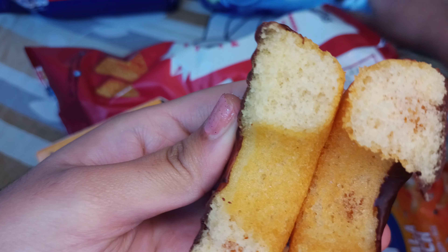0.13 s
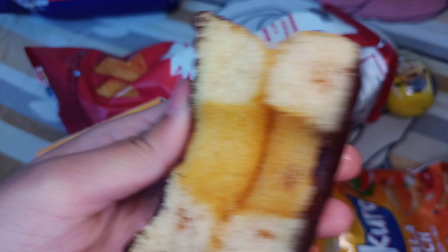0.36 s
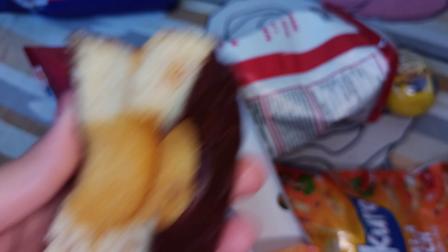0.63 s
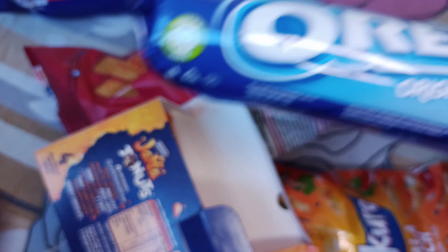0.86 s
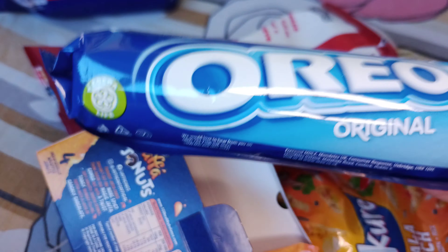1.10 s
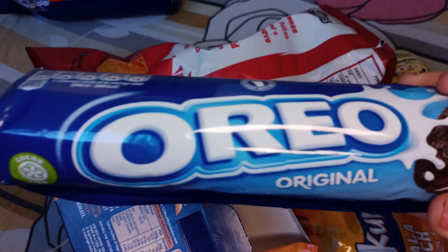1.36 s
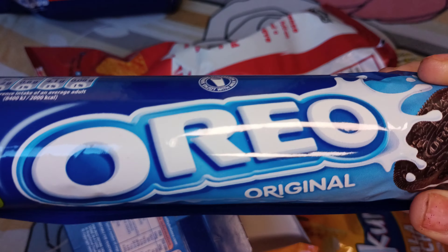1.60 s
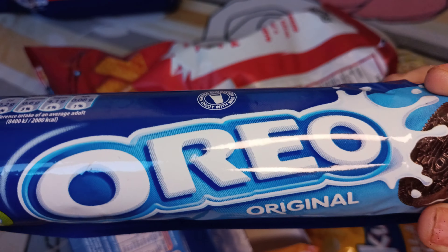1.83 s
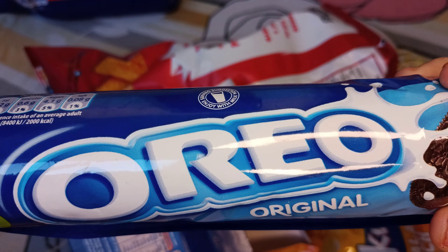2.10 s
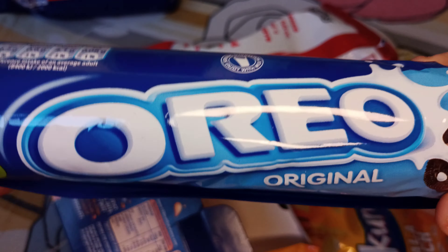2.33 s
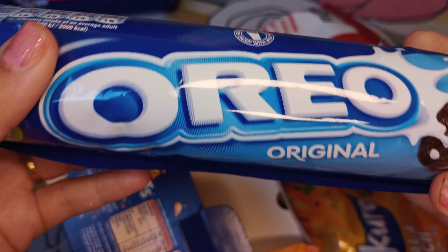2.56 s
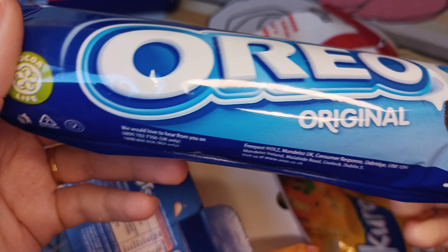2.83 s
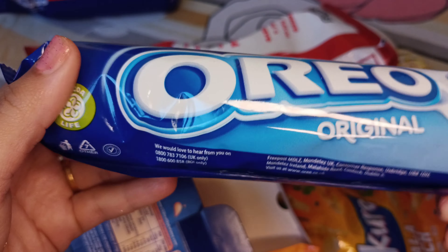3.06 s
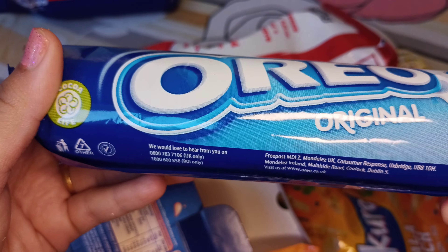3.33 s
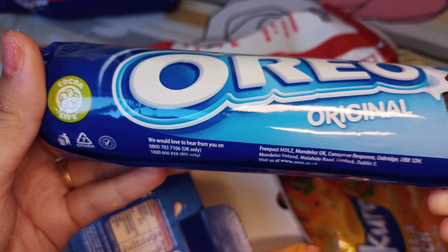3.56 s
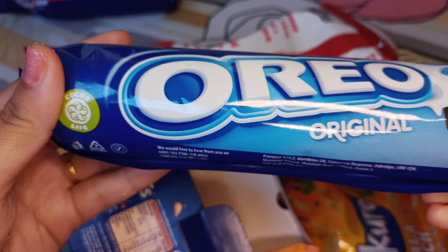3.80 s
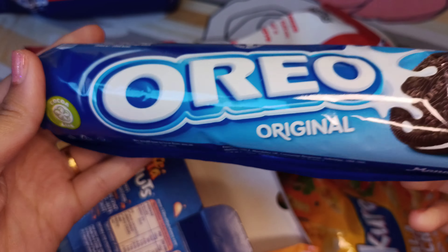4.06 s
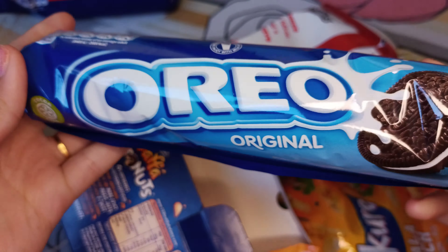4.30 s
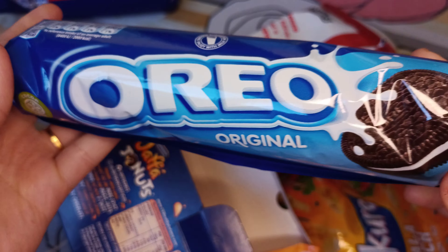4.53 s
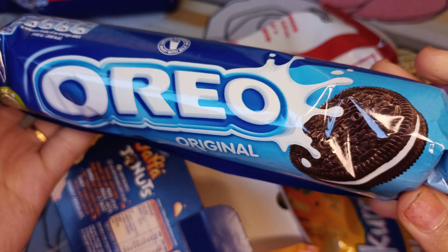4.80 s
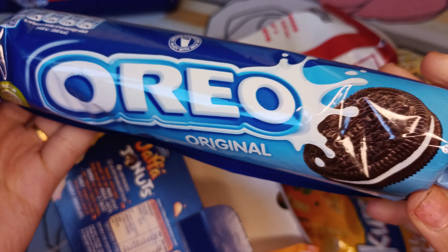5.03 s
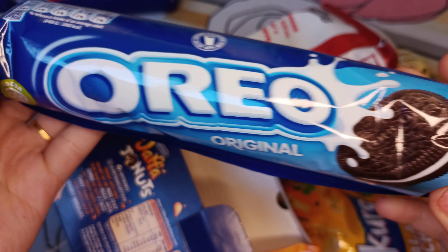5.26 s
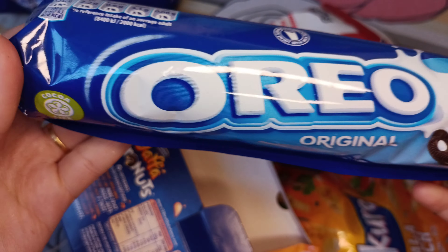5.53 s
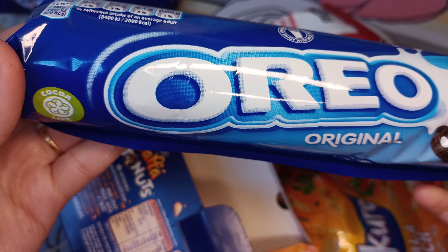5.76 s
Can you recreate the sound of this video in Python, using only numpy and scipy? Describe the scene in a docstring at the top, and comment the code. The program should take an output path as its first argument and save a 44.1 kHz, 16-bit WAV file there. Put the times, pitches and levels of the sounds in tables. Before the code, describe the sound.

A plastic snack wrapper is turned in the hands close up, snapping and crackling in bright bursts over a faint low hum in a furnished room.

```python
"""A furnished room, where two hands turn a plastic snack wrapper close to a phone microphone.
Creases snap over with a crack and damped rings; the film rustles in clumps of many small random crackles.
The room answers with fading noise tails, and fingers bump the bag as soft low thuds.
An appliance hums on two close tones and a weaker higher one, over soft filtered room noise."""
import sys
import numpy as np
from scipy import signal
from scipy.fft import rfft, irfft
from scipy.io import wavfile
from scipy.ndimage import map_coordinates

SR = 44100
rng = np.random.default_rng(int(sys.argv[2]) if len(sys.argv) > 2 else 0)


def makeup_ratio(level_db):
    """Linear amplitude ratio for a level in decibels (20 dB per factor of ten)."""
    decades = np.asarray(level_db, float) / 20
    return 10 ** decades


def materialize(psi):
    """Save the field psi as 16-bit PCM at rate SR to the path in sys.argv[1].

    A 1-D psi becomes a single channel; in a 2-D psi each row is a channel.
    """
    bounded = np.clip(np.atleast_2d(psi).T, -1, 1)
    quanta = np.round(bounded * 32767).astype(np.int16)
    wavfile.write(sys.argv[1], SR, quanta)


N = 259749  # length in samples
SECONDS = np.arange(N) / SR  # the time of every sample
TOP_HZ = 15800  # upper edge of the cracks and of the whole mix


def unit(x):
    """Scales a sound to an rms of 1."""
    return x / np.sqrt(np.mean(x ** 2) + 1e-20)


def along(points, hz):
    """Reads a curve of (frequency, value) points on a logarithmic frequency axis."""
    point_hz, value = np.transpose(points)
    return np.interp(np.log(hz + 1), np.log(point_hz + 1), value)


def wobble(rate):
    """A smooth random curve through `rate` random points a second."""
    points = rng.standard_normal(int(N * rate / SR) + 4)
    return map_coordinates(points, [np.arange(N) * rate / SR])


def coloured(x, spectrum):
    """Filters x to a (frequency, dB) shape without any sound coming early (minimum phase)."""
    size = 2 ** 12
    gain = makeup_ratio(along(spectrum, np.fft.rfftfreq(size, 1 / SR)))
    cepstrum = irfft(np.log(np.maximum(gain, 1e-4)))
    # folding the second half onto the first makes the filter causal
    cepstrum[1:size // 2] *= 2
    cepstrum[size // 2 + 1:] = 0
    return signal.fftconvolve(x, irfft(np.exp(rfft(cepstrum))))[:N]


def grains(s, size, hz, cycles, crack, crack_t60, wide=0):
    """Each grain is a thin crack that swells as the crease gives, plus a damped ring of its film panel."""
    t = np.arange(SR // 130) / SR  # a grain lasts under 8 ms
    hz = np.clip(hz, 100, SR / 2.2)[:, None]
    swell = (1 - np.exp(-t / 0.00021)) ** 2
    ring = np.sin(2 * np.pi * hz * t) * np.exp(-t * hz / cycles)  # soft film never rings long
    burst = rng.standard_normal((len(s), len(t))) * makeup_ratio(-60 * t / crack_t60)
    # adding each sample's neighbour dulls wide creases, subtracting it brightens tight ones
    dullness = np.clip(wide + 1.35 * rng.uniform(-0.5, 1, len(s)), -1, 1)[:, None]
    burst += dullness * np.roll(burst, 1, axis=1)
    # a small crease moves little air, so the crack has no bass
    band = signal.butter(2, [2000, TOP_HZ], "band", fs=SR, output="sos")
    burst = signal.sosfilt(band, burst)
    shape = swell * (ring + crack * burst)
    shape /= np.abs(shape).max(axis=1, keepdims=True)
    at = np.round(s * SR).astype(int)[:, None] + np.arange(len(t))
    return np.bincount(at.ravel(), (size[:, None] * shape).ravel(), N + SR)[:N]


# wide creases snapping over, which ring the bag; levels are relative, before the mix:
# (time [s], level [dB], body ring [dB, relative to that level])
WIDE_CREASES = [(.1303, -14.5, -1.5), (.624, -11.5, 1.5), (0.6588, 0, -32), (.7224, -9.5, 2),
                (0.8279, -13.5, 0), (0.9367, -7.5, -9), (0.967, -16.5, 10), (1.4318, -17.5, 1),
                (1.508, -24, 5.5), (1.9844, -33.5, 6), (2.0102, -30.5, -18), (2.2255, -25.5, -8),
                (2.4415, -18, -1), (2.528, -14, 2), (2.6521, -2, -10), (2.7073, -7.5, -3), (2.788, -8, -4),
                (2.877, -5.5, -19), (2.8837, -10, -3), (2.96, -5, -3), (3.1397, -7.5, 1), (3.1624, -4, -5),
                (3.1784, -10, -1.5), (3.216, -1.5, -11), (3.2855, -7, 0), (3.3437, -7, 1.5),
                (3.358, -10.5, 11), (3.6576, -8.5, -7), (4.0075, -3.5, -7), (4.233, -9, -3),
                (4.7413, -29, 7), (4.7508, -9.5, -18), (5.016, -22.5, 5.5), (5.0316, -26, 4),
                (5.091, -39.5, 14), (5.125, -19.5, -8.5), (5.2667, -31, 15), (5.3, -16, -4),
                (5.3893, -20, -12), (5.4814, -5.5, -5), (5.495, -15, -1), (5.5144, -2, -8.5),
                (5.6925, -7, 0), (5.8714, -15, -6)]
# tight creases in the thin film, which tick bright and barely move the bag; relative levels:
# (time [s], level [dB])
TIGHT_CREASES = [(0.2685, -13), (0.2868, -9.5), (0.3544, -13), (0.4809, -11), (0.5256, -0.5),
                 (0.5427, -2.5), (0.5455, -7), (0.5842, -11), (0.6029, -10), (0.6402, -18), (0.6548, -8),
                 (0.6623, -16), (0.6982, -8.5), (0.7378, -15), (0.8249, -26), (0.8546, -20),
                 (0.8993, -12.5), (0.9193, -13), (0.9527, -28), (1.3525, -14), (1.4043, -20.5),
                 (1.439, -20), (1.4591, -2.5), (1.4847, -22), (1.5126, -19.5), (1.8803, -26),
                 (2.1194, -21.5), (2.4263, -11), (2.5245, -10), (2.5678, -9.5), (2.571, -9.5), (2.6806, -9),
                 (2.7775, -15), (2.8088, -11.5), (2.9049, -8), (3.0129, -5), (3.0192, -9), (3.0606, -7),
                 (3.124, -10.5), (3.1484, -22), (3.1549, -5), (3.2068, -12), (3.213, -9.5), (3.2345, -18),
                 (3.2566, -9), (3.2816, -6), (3.4043, -10.5), (3.4097, -4.5), (3.4507, -6), (3.4736, -3),
                 (3.5447, -16), (3.557, -13), (3.5598, -10.5), (3.5743, -15), (3.5866, -13.5),
                 (3.6924, -29), (3.7023, -2), (3.7107, -13), (3.7411, -3.5), (3.8183, -6), (3.8234, -0.5),
                 (3.9136, -6), (4.0467, -12), (4.0679, -3), (4.0743, -18.5), (4.1397, -10), (4.162, -12),
                 (4.1732, -5), (4.1945, -15), (4.2353, -10.5), (4.2441, -10), (4.2556, -8.5), (4.2644, -17),
                 (4.2703, -1.5), (4.2749, -6.5), (4.2828, -8), (4.3537, -19.5), (4.3566, -14.5),
                 (4.3603, -12), (4.369, -20), (4.528, -5.5), (4.5702, -1.5), (4.6023, -6), (4.6953, -25),
                 (4.699, -3), (4.8093, -5.5), (4.8409, -10.5), (4.8433, -3.5), (5.4259, -15),
                 (5.4286, -14.5), (5.4371, -12.5), (5.5575, -11.5), (5.5784, -15), (5.6088, -14),
                 (5.6134, -2.5), (5.6228, -11), (5.6268, -16), (5.6808, -5.5), (5.7131, -1),
                 (5.8464, -14.5)]


def snaps():
    """A crack, a high ring of the freed panel and two short dull body rings; more body, wider crease."""
    tight_body_db = -28.5  # body ring relative to the level of a tight crease
    creases = WIDE_CREASES + [(s, db, tight_body_db) for s, db in TIGHT_CREASES]
    s, db, body_db = np.transpose(creases)
    panel, upper, lower = rng.standard_normal((len(s), 3)).T
    s = s - 0.0005  # the crease starts to give just before the peak
    out = grains(s, makeup_ratio(db + 2.5), 4500 * np.exp(0.41 * panel), cycles=1.9, crack=15.0,
                 crack_t60=0.0032, wide=(body_db + 17.5) / 25)
    out += grains(s, makeup_ratio(db + body_db - 6.5), 2600 * np.exp(0.29 * upper), cycles=2, crack=0, crack_t60=1)
    out += grains(s, makeup_ratio(db + body_db - 7.0), 1100 * np.exp(0.33 * lower), cycles=1, crack=0, crack_t60=1)
    return out


# squeezes of the bag; relative levels, before the mix:
# (time of full grip [s], time held [s], film level [dB], thick fold level [dB, relative to the film])
GRIPS = [(0.042, 0.045, -33.5, 2.5), (0.118, 0.016, -26.5, -3.5), (0.299, 0.018, -25.5, -5),
         (0.541, 0.13, -30, -4.5), (0.941, 0.054, -42.5, 3), (1.429, 0.0384, -41.5, 0.5),
         (2.129, 0.022, -48.5, 0), (2.569, 0.47, -33.5, -2), (3.138, 0.1, -27.5, -4.5),
         (3.3, 0.028, -32.5, 4), (3.47, 0.094, -42, -2), (3.619, 0.085, -34.5, -3.5),
         (3.798, 0.4, -37.5, -8.5), (4.15, 0.11, -35.5, -4.5), (4.74, 0.096, -42.5, -2),
         (5.132, 0.019, -50, -23), (5.299, 0.039, -51.5, 11), (5.469, 0.082, -34.5, -3),
         (5.6, 0.057, -40, 1.5), (5.87, .05, -47, 3)]


def handling():
    """Film and fold levels in dB: every squeeze swells, holds and fades over the rustle of a still hand."""
    grip_db_per_s, let_go_db_per_s = 291.5, 124  # how fast the film rustle swells and fades
    fold_slower = 0.91  # thick folds swell and fade at this share of that speed
    rest_film_db, rest_fold_db, rest_swing = -58.5, -53.5, 0.61
    s, held, db, fold_db = np.transpose(GRIPS)[:, :, None]
    away_db = grip_db_per_s * np.maximum(s - SECONDS, 0)
    away_db += let_go_db_per_s * np.maximum(SECONDS - s - held, 0)
    # the still hand gets softer where the background level dips
    level_db = background_level()
    swing_db = rest_swing * np.minimum(level_db - level_db.mean(), 0)
    film = (db - away_db).max(axis=0)
    folds = (db + fold_db - fold_slower * away_db).max(axis=0)
    return np.maximum(film, rest_film_db + swing_db), np.maximum(folds, rest_fold_db + swing_db / 2)


def crackle(count, busy, mid_hz, spread_db, cycles, crack, clump_db):
    """Random small creases, mostly tiny, some larger, in clumps; only the share `busy` of them gives way."""
    when, pitch, luck, need = rng.random((count, 4)).T
    hz = mid_hz * 4.5 ** (pitch - 0.5)
    size = makeup_ratio(-spread_db * np.log(1.015 - luck))
    share = busy[(when * N).astype(int)]
    size *= (need < share) / np.sqrt(share)  # fewer grains are made louder
    clumps = makeup_ratio(clump_db * np.tanh(wobble(30)))
    return unit(clumps * grains(when * N / SR, size, hz, cycles, crack, crack_t60=0.0047))


def rustle():
    """Thin film crackles bright, thick folds low; a firm grip makes dense rustle, a light one lone ticks."""
    film_db, fold_db = handling()
    busy = np.clip(makeup_ratio(0.87 * (film_db + 33)), 0.015, 1)
    film = crackle(count=2800, busy=busy, mid_hz=3170, spread_db=2.0, cycles=2, crack=1.66, clump_db=3.0)
    folds = crackle(count=1900, busy=busy ** 0.3, mid_hz=588, spread_db=3.0, cycles=0.63, crack=0.26,
                    clump_db=5.5)
    return makeup_ratio(film_db) * film + makeup_ratio(fold_db) * folds


# fingers bumping the bag near the microphone: (time [s], level [dB], frequency [Hz])
FINGER_BUMPS = [(0.112, -26.5, 323), (0.329, -25, 278), (0.586, -26, 170), (1.424, -33.5, 151)]


def bumps():
    """Soft low thuds: each is a sine tone that swells within milliseconds and dies quickly."""
    s, db, hz = np.transpose(FINGER_BUMPS)[:, :, None]
    t = np.maximum(SECONDS - s, 0)
    swell = 1 - np.exp(-t / 0.0033)
    fade = makeup_ratio(db - 60 * t / 0.072)
    return (fade * swell * np.sin(2 * np.pi * hz * t)).sum(axis=0)


# how long the room's answer takes to fall by 60 dB: (frequency [Hz], time [s])
ROOM_DECAY = [(500, 0.28), (4500, 0.25), (16000, 0.16)]


def walls(x):
    """Each frequency of the room's answer dies at its own speed; the moving bag keeps getting new tails."""
    out = np.zeros(N + 2 * SR)
    step = SR // 5  # a new tail every fifth of a second
    for start in range(0, N, step):
        hz, t, noise = signal.stft(rng.standard_normal(SR // 2), SR, nperseg=256)
        fade = makeup_ratio(-60 * t / along(ROOM_DECAY, hz)[:, None])
        tail = signal.istft(noise * fade, SR, nperseg=256)[1]
        wet = signal.fftconvolve(x[start:start + step], tail / np.linalg.norm(tail))
        out[start + 130:][:len(wet)] += wet  # the answer comes 130 samples late
    return out[:N]


# the background swells and dips; it sets the hum fully, other sounds partly: (time [s], level [dB])
BACKGROUND_SWING = [(0.0, -49), (0.88, -51), (1.18, -68.5), (1.32, -56), (1.48, -44.5), (2.32, -45),
                    (3.34, -39), (3.5, -46.5), (4.14, -52), (5.46, -45.5), (5.88, -46.5)]


def background_level():
    """The background level in dB at every sample, in straight lines between the points."""
    s, db = np.transpose(BACKGROUND_SWING)
    return np.interp(SECONDS, s, db)


# tones of the appliance: (frequency [Hz], level [dB, relative to the background level])
HUM_TONES = [(205.6, -2), (182, -11), (408, -19.5)]
# shape of the room noise, whose overall level is set apart: (frequency [Hz], relative level [dB])
AIR_SHAPE = [(24, -55.5), (40, -2.5), (194, 7.5), (237, 1.5), (615, -6), (2150, -18), (4030, -21.5),
             (12100, -33), (16000, -28)]


def background():
    """Slightly unsteady hum tones over soft room noise, which the moving hands stir up."""
    level_db = background_level()
    hum = 0
    for hz, db in HUM_TONES:
        loudness = makeup_ratio(db + wobble(7.3))
        hum = hum + loudness * np.sin(2 * np.pi * hz * SECONDS + 0.26 * wobble(5.6))
    # the noise follows a share of the swing
    air = makeup_ratio(-56 + 0.27 * (level_db - level_db.mean()))
    air += makeup_ratio(-19 + handling()[1])  # stirred air follows the thick folds, 19 dB below
    return makeup_ratio(level_db) * hum + air * unit(coloured(rng.standard_normal(N), AIR_SHAPE))


# film and microphone together, with the port resonance and its octave: (frequency [Hz], gain [dB])
FILM_AND_MIC = [(140, -54), (230, -21.5), (720, -9.5), (2330, -11), (2990, -8.5), (3500, -8.5), (6400, -5),
                (7600, 1), (8600, -5.5), (10000, -13.5), (12200, -13.5), (13400, -11), (15500, 0.5)]


def scene():
    """The wrapper, near and in the room, over the background; its level dips briefly along with its echo."""
    bag = snaps() + rustle()
    lull_start_s, lull_end_s, lull_edge_s, lull_db = 1.002, 1.335, 0.026, -13
    # the dip ends four times as fast as it begins
    edges = np.minimum(SECONDS - lull_start_s, 4 * (lull_end_s - SECONDS))
    lull = np.clip(edges / lull_edge_s, 0, 1)
    bag_in_room = bag + makeup_ratio(-12.0) * walls(bag)
    near = makeup_ratio(4.0 + lull_db * lull) * coloured(bag_in_room, FILM_AND_MIC)
    return (near + bumps() + background())[None]


def band_limit(x):
    """A steep low-pass at the top of the band."""
    return signal.sosfilt(signal.butter(12, 16990, fs=SR, output="sos"), x)


def record(dry):
    """The top treble is cut steeply and peaks stop at full scale."""
    low_pass = signal.ellip(9, 0.3, 70, TOP_HZ, fs=SR, output="sos")
    finished = np.clip(signal.sosfilt(low_pass, dry), -1, 1)
    return band_limit(finished)


dry = scene()
out = record(dry)
materialize(out)
```